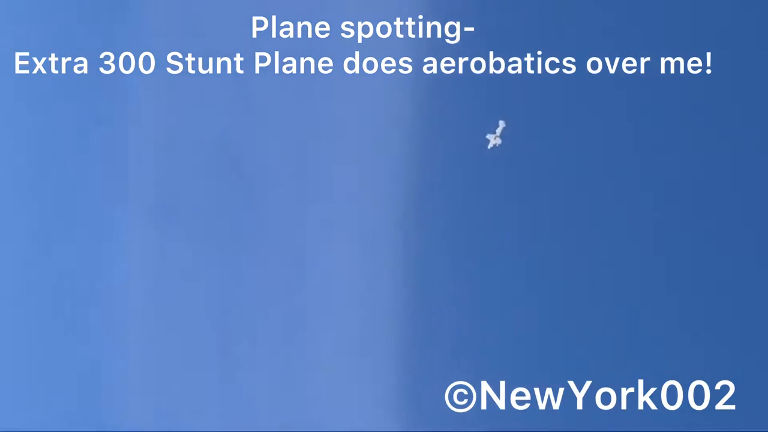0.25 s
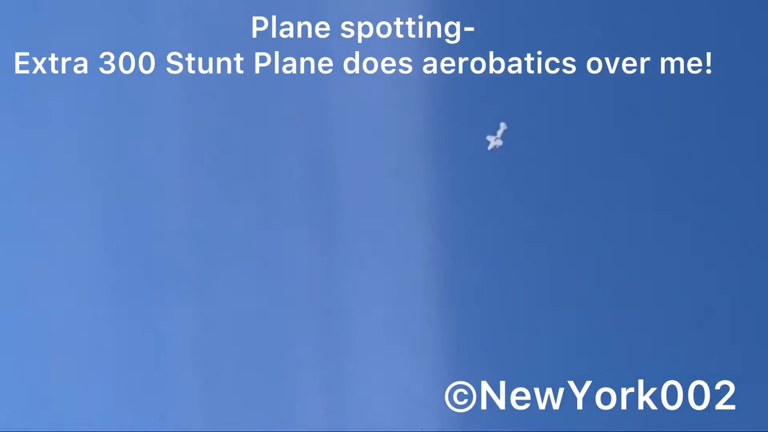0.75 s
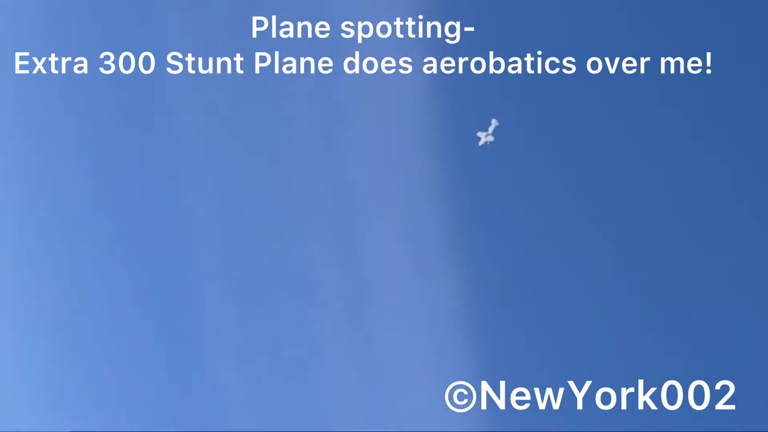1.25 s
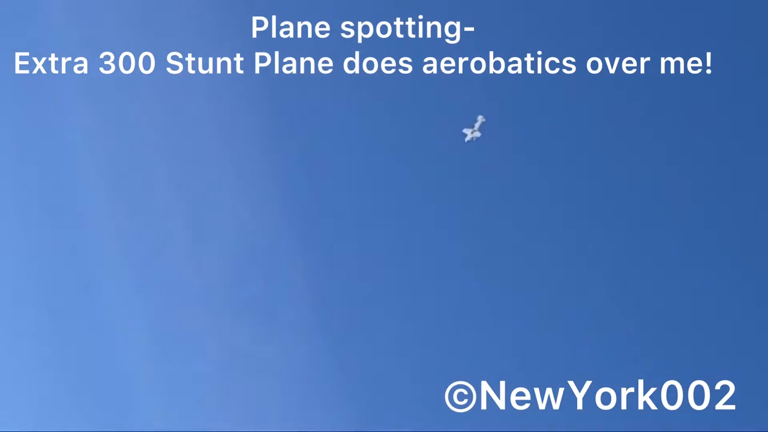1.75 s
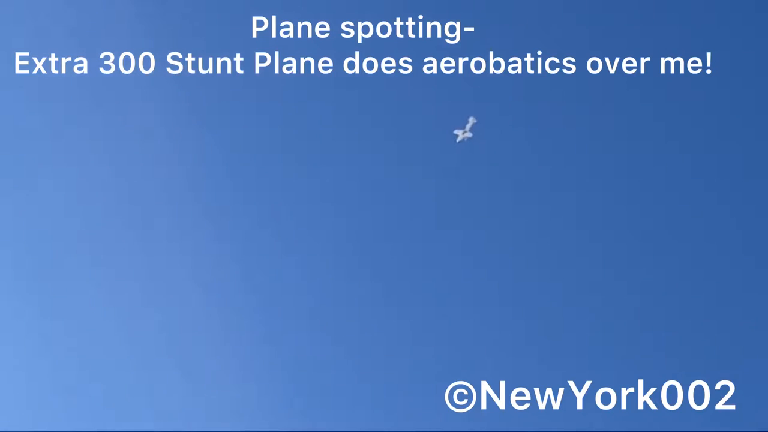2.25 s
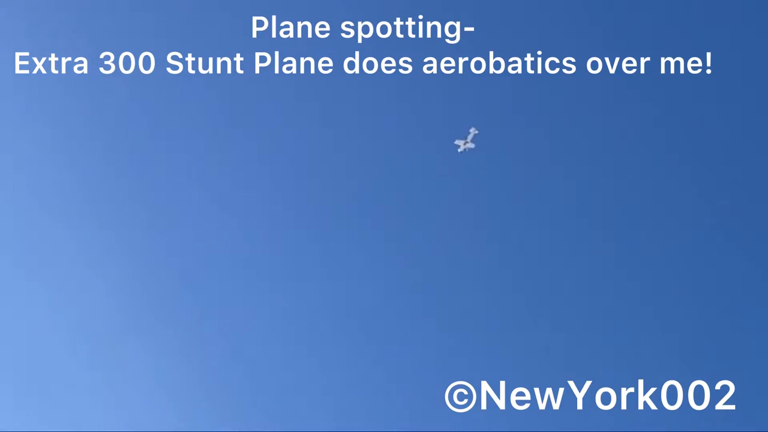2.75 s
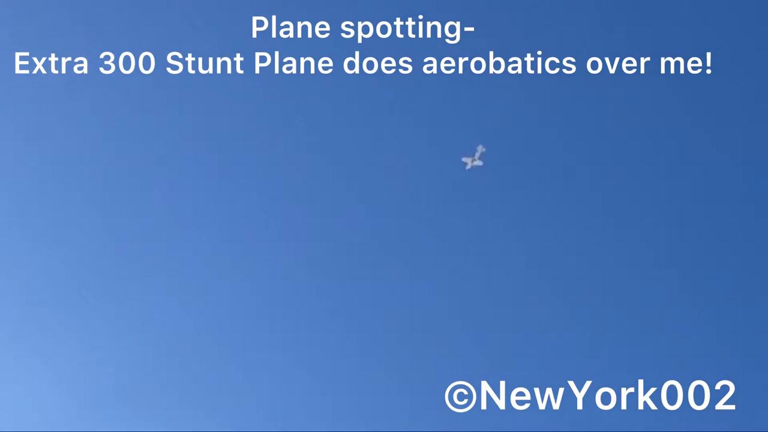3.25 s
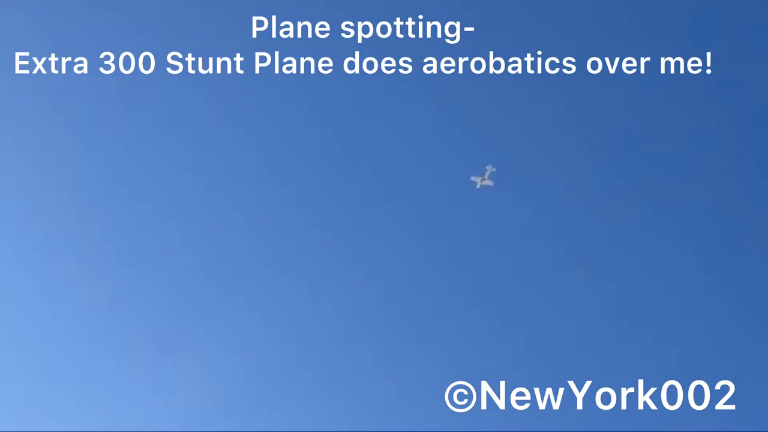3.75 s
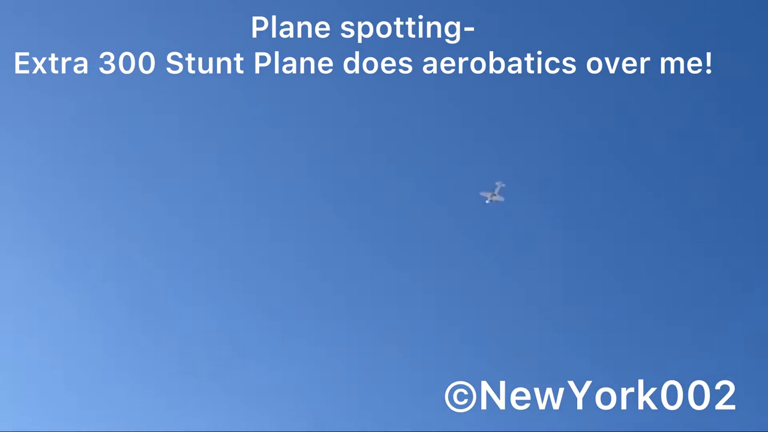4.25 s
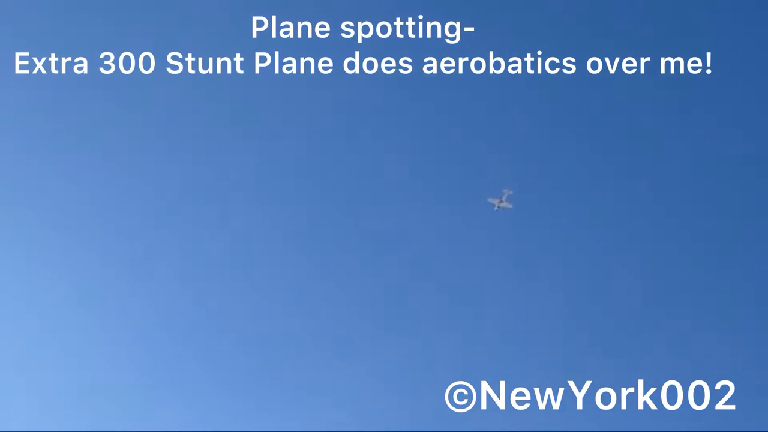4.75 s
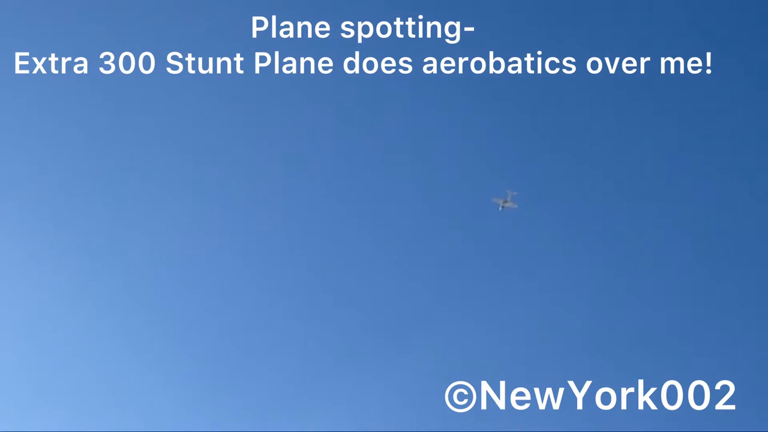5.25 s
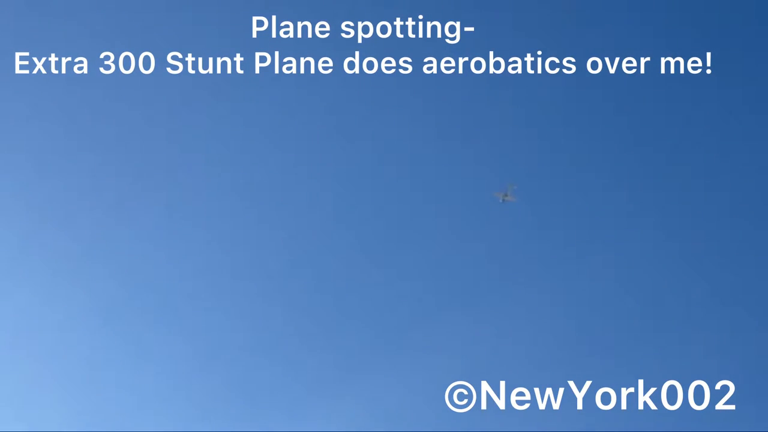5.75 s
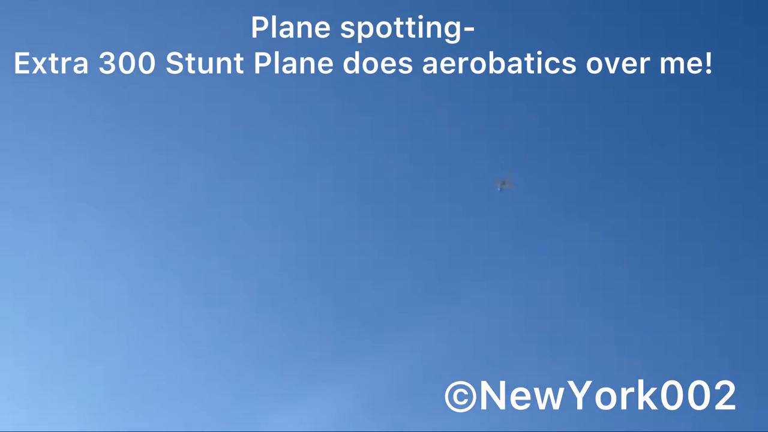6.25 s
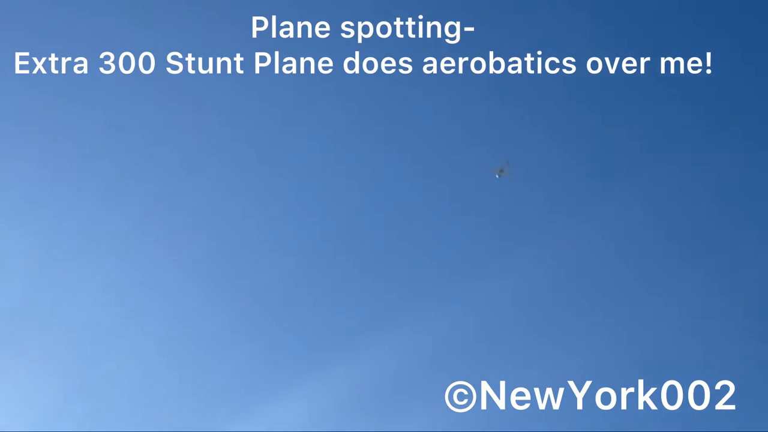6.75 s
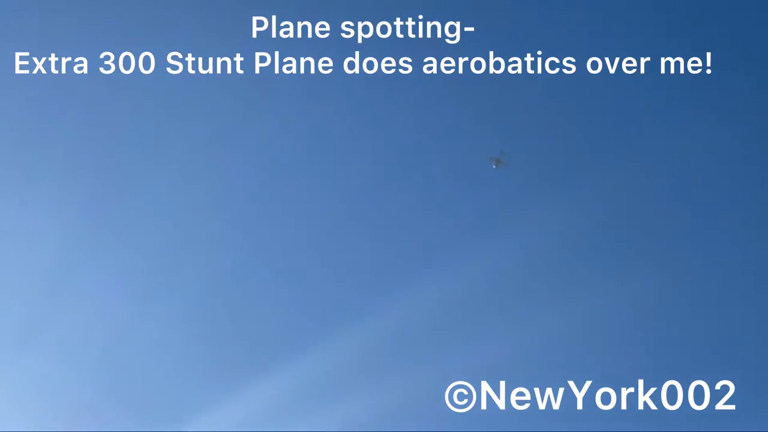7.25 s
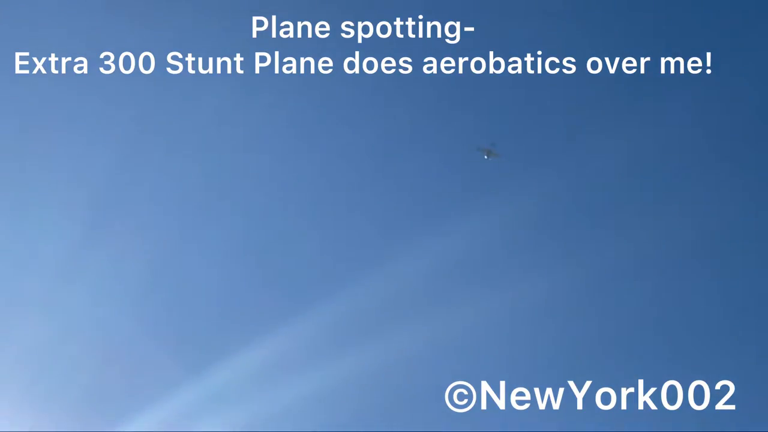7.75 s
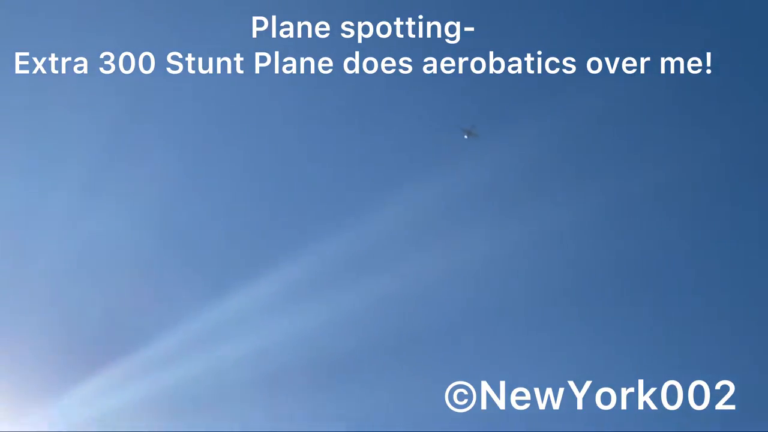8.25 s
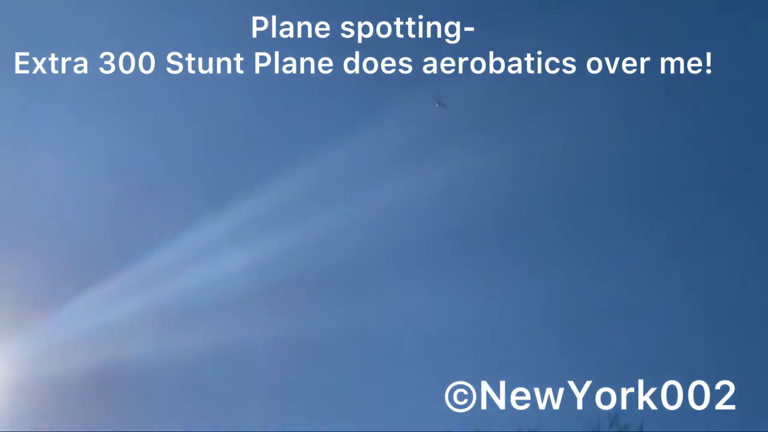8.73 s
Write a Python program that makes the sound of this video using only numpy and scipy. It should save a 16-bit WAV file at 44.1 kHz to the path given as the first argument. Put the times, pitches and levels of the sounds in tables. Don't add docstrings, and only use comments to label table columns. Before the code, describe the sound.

A six-cylinder stunt plane passes far above a handheld stereo microphone, already droning at the start. The pitch slides down by about two semitones, with wavering tone and whooshing roar that comes and goes. Deep wind buffets open the scene, return strongly near three seconds and again before five, then ease. Tiny watery ticks, one very faint bird chirp and soft hiss lie underneath; the drone continues to the end.

```python
import sys
import numpy as np
from scipy import signal
from scipy.io import wavfile

SR = 44100
rng = np.random.default_rng(int(sys.argv[2]) if len(sys.argv) > 2 else 0)


def transcribe(signal):
    frames = np.atleast_2d(signal).T
    limited = np.clip(frames, -1, 1)
    pcm = np.round(limited * 32767).astype(np.int16)
    wavfile.write(sys.argv[1], SR, pcm)


def nominal_scale(level):
    x = np.asarray(level, float) / 20
    return 10 ** x


N = 396459
SLOW = 16
PORTS = np.array([[1], [-1]])

# time in seconds, middle band in dB, top band in dB.
HISS_LEVEL = [
    (0.0, -65, -72),
    (8.65, -69, -79.5),
    (8.99, -69, -80),
]


def rms_one(x):
    return x / np.sqrt(np.mean(x ** 2) + 1e-20)


def in_time(rows, step=1):
    s, *columns = np.transpose(rows)
    return [np.interp(np.arange(0, N, step) / SR, s, c) for c in columns]


def at_hz(points, hz):
    points = np.array(points)
    return np.interp(np.log(hz), np.log(points[:, 0]), points[:, 1])


def band(x, low_hz, high_hz, order=2):
    return signal.sosfilt(signal.butter(order, [low_hz, high_hz], "band", fs=SR, output="sos"), x)


def drift(rate, step=1):
    r = np.exp(-128 * np.pi * rate / SR)
    white = rng.standard_normal(N // 64 + 1502)
    slow = signal.lfilter([1], [1, -2 * r, r * r], white)[1500:]
    return np.interp(np.arange(0, N, step) / 64, np.arange(len(slow)), rms_one(slow))


def bands(colour, edges, patchy_db):
    # pitch in Hz, side against mid in dB.
    side_level = [(60, -11.5), (200, -19.5), (400, -18.5), (700, -13), (1200, -11), (1900, -5), (2400, -29),
                  (3000, -53), (14000, -60.5)]
    white = rng.standard_normal((2, 2, N))
    together = drift(4.1)
    for k, (low, high) in enumerate(zip(edges, edges[1:])):
        mid, side = band(white[k % 2], low, high)
        hz = np.sqrt(low * high)
        gain = nominal_scale(at_hz(colour, hz) + patchy_db * (0.72 * together + drift(6.4)))
        yield hz, gain * (mid + nominal_scale(at_hz(side_level, hz)) * side * PORTS)


def engine():
    # order, level in dB.
    low_orders = [(7, -67), (8, -46), (9, -42), (10, -52), (11, -59), (12, -32), (13, -57), (14, -48),
                  (15, -45.5), (16, -53), (17, -50), (18, -34), (19, -48), (20, -48), (21, -47), (22, -55),
                  (23, -45), (24, -43.5), (25, -50), (26, -54), (27, -48), (28, -59), (29, -52), (30, -52),
                  (31, -53), (32, -57), (6, -23)]
    # time in seconds, rate in Hz.
    firing_rate = [(0.0, 117.1), (0.7, 116.75), (1.6, 115.7), (2.05, 114.35), (2.5, 113.6), (2.9, 113.35),
                   (3.9, 111.25), (4.2, 110.1), (4.7, 109.7), (5.4, 109.4), (5.9, 108.6), (6.35, 107.15),
                   (6.8, 106.55), (7.2, 105.9), (7.6, 104.85), (8.1, 104.1), (8.99, 103.7)]
    # time in seconds, first, second, fourth and up in dB.
    flight = [(0, -18.5, -32.5, -36), (.25, -34.5, -40, -27.5), (.75, -17.5, -25.5, -34),
              (1.35, -20, -34.5, -32), (1.85, -19.5, -29, -29), (2.3, -22, -33.5, -34.5),
              (2.65, -18, -28.5, -31), (3.3, -22.5, -26.5, -41.5), (4.1, -24.5, -29, -48.5),
              (4.7, -24, -30.5, -35.5), (5.1, -18, -29, -32), (5.85, -21, -29.5, -26),
              (6.35, -24, -34.5, -44.5), (6.7, -24, -39.5, -34.5), (6.95, -21, -39.5, -39.5),
              (7.3, -22.5, -34.5, -35), (7.8, -24.5, -40, -32.5), (8.99, -28.5, -36, -33)]
    # time in seconds, level in dB.
    third_tone = [(.3, -45.5), (.9, -34.5), (1.35, -40), (1.65, -30.5), (2.05, -32.5), (2.3, -49.5),
                  (2.65, -31.5), (3.7, -40.5), (4.75, -41.5), (5.2, -34.5), (5.85, -33), (6.25, -41),
                  (6.7, -34), (6.95, -45), (7.06, -30.5), (7.45, -28), (7.75, -34.5), (8.99, -33)]
    # time in seconds, edge on the fifth and sixth firing tones in dB,
    # uneven-cylinder throb in dB, rasp in dB, tone between second and third in dB.
    exhaust = [(.25, 3, -58, -64, -47), (.75, 5.5, -52, -57, -42), (1.25, 5, -56, -51, -42),
               (1.75, 2, -51, -50, -43), (2.25, 3, -52, -46, -43), (2.75, 5, -51, -46, -45),
               (3.25, -1, -55, -45, -44), (3.75, 1, -52, -44, -41), (4.25, -10, -50, -42, -45),
               (4.75, -5, -50, -47, -46), (5.25, -5, -45, -48, -44), (5.75, 0, -42, -42, -46),
               (6.25, 1, -46, -55, -49), (6.75, 5, -44, -48, -53), (7.25, 0, -39, -45, -62),
               (7.75, 1, -43, -46, -55), (8.25, -3, -44, -50, -52), (8.75, -1, -45, -50, -54)]
    # time in seconds, left against right in dB.
    bearing = [(0, 0), (1.0, -1.2), (2.2, -.6), (3.6, -.4), (5, -1.4), (6.6, -1.8), (9, -1.5)]
    # time in seconds, shift of odd orders in radians.
    bank_path = [(0, .6), (2.2, .9), (3.5, 1.6), (4.8, 1.4), (5.7, .7), (7, .2), (9, 0)]
    edge, throb, rasp, between = in_time(exhaust, step=SLOW)
    first, second, higher = in_time(flight, step=SLOW)
    third, = in_time(third_tone, step=SLOW)
    rate, = in_time(firing_rate, step=SLOW)
    pan, = in_time(bearing, step=SLOW)
    bank_slip, = in_time(bank_path, step=SLOW)

    carried = swells(step=SLOW)[0]
    banks = 0.57 * first
    throb = throb + 0.32 * carried
    rasp = rasp + 0.39 * carried

    upper_orders = []
    for k in range(33, 54):
        level_db = -64.5 - 0.8 * (k - 33) + 8 * (k % 6 == 0)
        scatter_db = 7 * (-1) ** k * (k % 3 > 0) + 5 * (k == 44)
        upper_orders.append((k, level_db + scatter_db))
    orders = [*low_orders, *upper_orders]

    start_rad, turn_rad, wander_rad, pipe_rad = .88, .6, .2, 1.4
    late_orders, early_orders = (13, 21, 25, 27), (14, 20, 22)
    cycle = 2 * np.pi * np.cumsum(rate) / 6 * SLOW / SR + start_rad
    slip = np.linspace(-turn_rad, 0, len(rate))
    firing = {6: first, 12: second, 18: third}
    odd = {15: between, 21: .5 * carried, 10: -throb / 2,
           13: throb / 3, 16: throb / 3, 20: throb / 3, 22: throb / 3}
    out = np.zeros((2, len(rate)))
    for (order, level_db), (offset, port) in zip(orders, rng.standard_normal((len(orders), 2))):
        if order % 6 == 0:
            swell = firing.get(order, higher)
            offset = .7 * (order == 24)
            level_db = level_db + edge * {30: 1.5, 36: 1.5}.get(order, 0)
        else:
            swell = rasp if order > 22 else odd.get(order, banks if order < 12 else throb)
            offset = offset * (.15 if 12 < order < 30 else 1.7)
            offset = offset + pipe_rad * ((order in late_orders) - (order in early_orders))
            offset = offset + bank_slip * (order % 2) + wander_rad * drift(.4, step=SLOW)
        shimmer = order / 18
        flicker_db = shimmer * (.5 * drift(.7, step=SLOW) + .4 * drift(6.0, step=SLOW))
        gain = np.sqrt(2) * nominal_scale(level_db + swell - np.median(swell) + flicker_db)
        phase = order * cycle + 1.45 + (1.1 + slip) * (order == 6) + offset
        phase = phase + .08 * shimmer * drift(2.0, step=SLOW)
        out += gain * np.cos(phase + (.06 + .06 * shimmer * port) * PORTS)
    out = out * nominal_scale(pan / 2 * PORTS)
    tones = signal.resample_poly(out, SLOW, 1, axis=1)[:, :N]
    return tones, np.interp(np.arange(N) / SLOW, np.arange(len(cycle)), cycle)


def roar(cycle):
    # pitch in Hz, density in dB per Hz.
    roar_colour = [(40, -16.5), (60, -6.5), (90, 1.5), (200, 2.5), (400, 3.5), (620, -2.5), (850, -4),
                   (1100, -7.5), (1650, -10), (1850, -11.5), (2400, -21.5), (3400, -33.5), (5000, -45.5)]
    # time in seconds, notch in Hz.
    notch_path = [(0, 2580), (.55, 664), (.85, 1410), (1.3, 980), (1.5, 1670), (2.75, 800), (2.95, 1477),
                  (4.2, 2610), (5.3, 704), (5.62, 1520), (5.78, 4200), (5.87, 1020), (5.97, 1790),
                  (6.4, 600), (7.2, 690), (7.5, 2979), (8.2, 750), (9, 880)]
    swell_db, shine_db, weight_db = swells()
    swell_db = swell_db - .5 * np.arange(N) / SR
    deep_db = -52 + 0.6 * swell_db + weight_db
    middle_db = -57 + swell_db
    bright_db = -74.5 + 1.48 * swell_db + shine_db
    beat = 1 + .5 * np.cos(6 * cycle + 1.2) + .2 * np.cos(cycle)
    edges = [40, 65, 100, 150, 220, 310, 430, 580, 760, 980, 1230, 1480, 1800, 2050, 2400, 2900, 3600, 4600]
    low, bright = 0, 0
    for hz, part in bands(roar_colour, edges, patchy_db=1.5):
        if hz > 1800:
            bright = bright + nominal_scale(bright_db + 36.5) * part
        elif hz > 1000:
            low = low + nominal_scale(middle_db + 28.5) * part
        else:
            follow = np.clip(hz / 600, .4, 1)
            low = low + nominal_scale(follow * (deep_db + 50) - 26.5) * part
    shelf = signal.cheby2(7, 25, 1850, fs=SR, output="sos")
    direct = beat * (signal.sosfilt(shelf, low) + bright)
    notch_hz, = in_time(notch_path)
    late = np.arange(N) - SR / (2 * notch_hz)
    delayed = np.array([np.interp(late, np.arange(N), side) for side in direct])
    return 0.7 * (direct + 0.36 * delayed)


def swells(step=1):
    # centre in seconds, strength in dB, length in seconds, extra bright in dB, extra deep in dB.
    swell_rows = [(0.325, 9, 0.1, -12, 3), (.62, -6, 0.13, 0, 5.5), (0.975, 6.5, 0.17, -0.5, 6),
                  (1.237, 7, 0.086, -9, 1.5), (1.574, 4.5, 0.17, 2, 1), (1.445, -3, 0.054, -2.5, 0.5),
                  (1.786, 0, 0.17, 6, -1), (1.974, 10, 0.19, -12.5, 2), (2.296, 6.5, 0.096, -3.5, -1.5),
                  (2.621, 8, 0.3, -3.5, 11.5), (3.057, 10.5, 0.14, -4.5, 4), (3.26, 9, 0.095, 0, 2.5),
                  (3.623, 9.5, 0.24, 0, 0.5), (4.004, 0.5, 0.23, 3.5, 0), (4.948, 6, 0.31, -7.5, 1),
                  (5.464, 8, 0.27, -0.5, 3), (5.711, 9, 0.1, 4.5, 1), (6.049, 10.5, 0.24, -2.5, 2.5),
                  (6.19, 0, 0.074, 5.5, 2.5), (6.445, -3, 0.13, 8, 1.5), (6.749, -2, 0.3, 10, 5),
                  (7.414, 12.5, 0.19, -4, 8.5), (7.572, -1.5, 0.082, 14.5, 1.5), (7.811, 3, 0.16, 8, 3.5),
                  (8.2, 3.5, 0.24, 0.5, -7), (8.6, -4.5, 0.59, 10, 10)]
    t = np.arange(0, N, 64) / SR
    s, strength_db, length, bright_db, deep_db = np.transpose(swell_rows)[:, :, None]
    bell = np.exp(-np.abs((t - s) / length) ** 2.5)
    when = np.arange(0, N, step) / SR
    return [np.interp(when, t, (db * bell).sum(axis=0)) for db in (strength_db, bright_db, deep_db)]


def wind():
    # time in seconds, peak in dB, pitch in Hz.
    thumps = [(0.015, -4, 129), (0.051, -4, 117), (0.056, -6.5, 60), (0.077, -10, 95), (0.098, -7.5, 106),
              (0.126, -4.5, 124), (0.149, -5.5, 139), (.173, -6, 166), (.215, -14, 242), (0.299, -18, 120),
              (0.337, -15, 104), (0.625, -12, 110), (.694, -8.5, 107), (.783, -15, 106), (0.934, -26.5, 84),
              (0.956, -12, 106), (1.253, -16.5, 99.4), (1.824, -20, 105), (1.927, -14, 104),
              (2.002, -24, 101), (2.088, -11, 90), (2.155, -16, 70.5), (2.301, -17, 88), (2.37, -19, 83),
              (2.589, -13.5, 111), (2.639, -8, 129), (2.653, -9, 130), (2.684, -5, 111), (2.7, -5, 187),
              (2.72, -5, 129), (2.79, -13, 86), (3.049, -16, 114), (3.069, -8.5, 96), (3.095, -9, 71),
              (3.127, -11, 87), (3.157, -10, 96), (3.169, -7, 116), (3.198, -13, 83), (3.224, -12, 77),
              (3.251, -15, 91.5), (3.271, -12, 87), (3.31, -13, 98), (3.355, -26, 96), (3.406, -12, 99),
              (3.452, -13, 96), (3.527, -15, 91), (4.147, -13.5, 94), (4.395, -13, 86), (4.452, -8.5, 89),
              (4.544, -11.5, 96), (4.574, -17, 98), (4.607, -13, 112), (4.654, -14, 106), (4.685, -12, 104),
              (4.723, -20, 91), (0.061, -2.5, 302), (.149, -13, 334), (0.178, -7.5, 310), (2.715, -25, 45),
              (3.171, -16, 230)]
    gust_db = gusts()
    white = rng.standard_normal((2, 2, N)) * [[[1]], [[.09]]]
    low = band(white[:, 0], 51, 133.3, order=3) * 14 * nominal_scale(gust_db + 3.0)
    high_db = np.minimum(1.86 * (gust_db + 16.5) - 20.0, -14)
    high = band(white[:, 1], 61, 620) * 10 * nominal_scale(high_db)
    mid, side = nominal_scale(2.5 * drift(30.0)) * (low + high)

    buffets, t = np.zeros(N + 4096), np.arange(-1024, 2048) / SR
    for (s, peak_db, hz), turn in zip(thumps, rng.uniform(0, 2 * np.pi, len(thumps))):
        shape = np.exp(-(t * hz / np.where(t < 0, .7, 1.15)) ** 2)
        swing = np.cos(2 * np.pi * hz * t * (1 - 0.074 * hz * t) + turn)
        overtone = np.clip(0.26 + 0.014 * peak_db, .05, 1) * (hz < 250)
        swing = swing + overtone * np.cos(4.6 * np.pi * hz * t)
        swing = swing + 0.099 * (hz < 170) * shape * np.cos(7.4 * np.pi * hz * t + turn)
        buffets[round(s * SR):][:len(t)] += nominal_scale(peak_db - 5.0) * shape * swing
    return mid + side * PORTS + buffets[1024:N + 1024] * nominal_scale(-.6 * PORTS)


def gusts():
    # peak time in seconds, peak in dB, rise in seconds, fall in seconds.
    gust_rows = [
        (.15, -29.5, 4.4, 0.19),
        (.3, -31, 0.22, 0.39),
        (.72, -35.5, 0.23, 0.46),
        (2.049, -33, 0.44, 0.31),
        (2.7, -29.5, 0.2, 0.12),
        (3.141, -28.5, 0.27, 0.35),
        (4.11, -37, .11, 0.41),
        (4.46, -39, 0.24, 0.17),
        (4.71, -33.5, 0.34, 0.042),
        (6.56, -42, .1, 2.76),
    ]
    t = np.arange(0, N, 64) / SR
    ramp_db = 10.5
    ramps = [db - ramp_db * np.maximum((s - t) / rise, (t - s) / fall) for s, db, rise, fall in gust_rows]
    breeze = -42.5 - 0.9 * t
    return np.interp(np.arange(N) / SR, t, np.max(ramps + [breeze], axis=0))


def drops():
    # time in seconds, peak in dB, pitch in Hz.
    clear = [(.438, -54, 4310), (.567, -49.5, 3940), (.67, -53, 4970), (.685, -53, 3770), (.891, -49, 4420),
             (1.239, -55.5, 5260), (1.511, -55, 3800), (1.659, -54.5, 3270), (1.745, -55, 3270),
             (1.82, -53, 4100), (1.996, -59, 4930), (2.013, -55, 4000), (2.045, -58, 3640),
             (2.345, -53.5, 3920), (2.528, -56, 3170), (2.79, -59, 3900), (2.966, -57, 4500),
             (3.009, -58, 4450), (3.08, -49.5, 3160), (3.234, -56, 5900), (3.472, -45.5, 3700),
             (3.582, -51.5, 5700), (3.697, -57, 3760), (3.942, -55, 5200), (3.972, -55, 5800),
             (4.371, -59, 3400), (4.408, -54, 5100), (4.453, -61, 5900), (4.508, -55, 6600),
             (4.561, -56, 5500), (4.732, -61, 4200), (4.868, -61, 4400), (5.035, -48.5, 4130),
             (5.18, -53.5, 5250), (5.404, -50, 3820), (5.512, -57, 5700), (5.619, -52.5, 4310),
             (5.961, -53, 5170), (6.035, -58, 5740), (6.396, -59, 5500), (6.45, -49, 5070),
             (6.459, -55, 5170), (6.486, -59, 5280), (6.636, -57, 4600), (6.653, -56, 3790),
             (6.74, -60, 5280), (6.973, -60, 4420), (7.116, -55.5, 3620), (7.164, -64, 6890),
             (7.267, -59, 4600), (7.333, -59, 3600), (7.419, -58, 6500), (7.507, -52, 2880),
             (7.577, -52, 3450), (7.673, -59, 7100), (7.79, -59, 4030), (8.301, -56, 6030),
             (8.363, -51, 5170), (8.616, -58, 5600), (8.811, -52, 5200)]
    out, t = np.zeros((2, N + 1024)), np.arange(1024) / SR
    when, size, pitch = rng.random((36, 3)).T
    faint = np.transpose([when * N / SR, -65 + 2.5 * (2 * size - 1), 3000 * (7000 / 3000) ** pitch])
    every = [*clear, *faint]
    for (s, peak_db, hz), (climb, place) in zip(every, rng.random((len(every), 2))):
        sweep = hz * t * (.96 + (30 * climb - 5) * t)
        shape = np.exp(-(t * hz / 4.2) ** 1.1) * (1 - np.exp(-t / 0.0003))
        ring = np.sin(2 * np.pi * sweep) * shape
        gain = nominal_scale(peak_db + 12.5) * nominal_scale((place - 2.0) * .3 * PORTS)
        out[:, round((s + .0008) * SR):][:, :1024] += gain * ring
    return out[:, :N]


def bird():
    # start in seconds, peak in dB, from Hz, to Hz, length in seconds.
    chirps = [
        (1.026, -55, 5900, 7900, .009),
        (1.036, -54, 6000, 8100, .013),
        (1.059, -55.5, 7600, 5200, .007),
    ]
    out, t = np.zeros(N), np.arange(1024) / SR
    for s, peak_db, from_hz, to_hz, length in chirps:
        sweep = from_hz * t + (to_hz - from_hz) * t ** 2 / (2 * length)
        shape = np.sin(np.pi * np.minimum(t / length, 1) ** .45)
        out[round(s * SR):][:1024] += nominal_scale(peak_db) * np.sin(2 * np.pi * sweep) * shape
    return out


def hiss():
    # pitch in Hz, density in dB per Hz.
    hiss_colour = [(1500, 3), (2500, 3), (3700, -1.5), (5400, -1), (6700, -7), (7500, -11.5), (9400, -1),
                   (11000, 3), (12500, -1), (14000, -6.5)]
    middle_db, top_db = in_time(HISS_LEVEL)
    middle_edges = [1500, 2300, 3200, 4200, 5300, 6300, 7100, 7900]
    top_edges = [8700, 10000, 11300, 12600, 13600, 14600]
    middle = sum(part for hz, part in bands(hiss_colour, middle_edges, patchy_db=.8))
    top = sum(part for hz, part in bands(hiss_colour, top_edges, patchy_db=.9))
    return nominal_scale(middle_db + 3.5) * rms_one(middle) + nominal_scale(top_db - 1.0) * rms_one(top)


def side_hiss():
    # lower edge in Hz, upper edge in Hz.
    side_bands = (6300, 10300), (13000, 15800)
    top_db = in_time(HISS_LEVEL)[1]
    white = rng.standard_normal(N)
    lower, upper = (rms_one(band(white, low, high, order=10)) for low, high in side_bands)
    return nominal_scale(top_db + .7 * drift(5.0)) * (nominal_scale(-0.5) * lower + nominal_scale(-5.0) * upper) * PORTS


def scene():
    tones, cycle = engine()
    return tones + roar(cycle) + wind() + drops() + bird() + hiss()


def roll_off(x):
    return signal.sosfilt(signal.butter(12, 14310, fs=SR, output="sos"), x)


def record(dry):
    x = dry * (1 + nominal_scale(-65) * np.cos(2 * np.pi * 12000 * np.arange(N) / SR))
    limit = .62
    x = limit * np.tanh(x / limit)
    x = x * np.minimum(np.arange(N) / (.004 * SR), 1)
    x = signal.sosfilt(signal.cheby2(8, 30, (7750, 8850), "bandstop", fs=SR, output="sos"), x)
    x = signal.sosfilt(signal.cheby2(8, 30, 14300, fs=SR, output="sos"), x)
    return roll_off(x + side_hiss())


dry = scene()
out = record(dry)
transcribe(out)
```